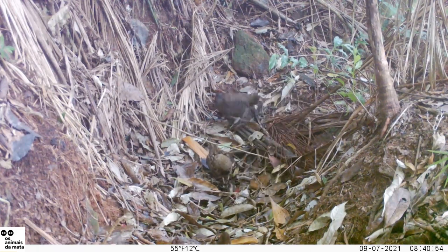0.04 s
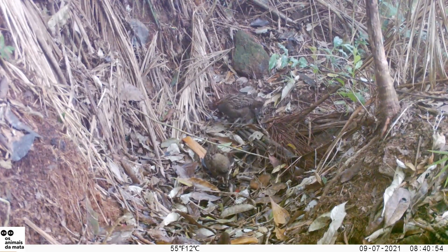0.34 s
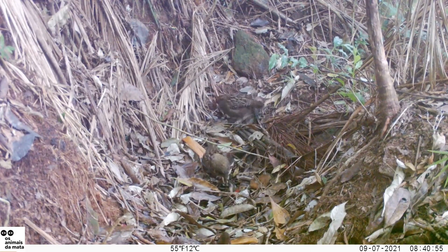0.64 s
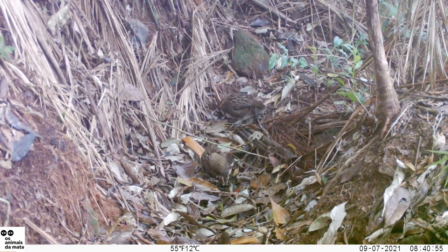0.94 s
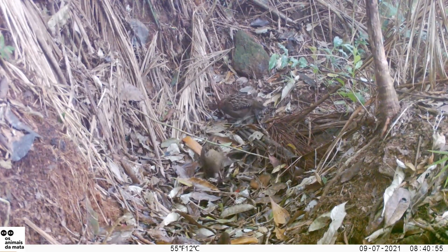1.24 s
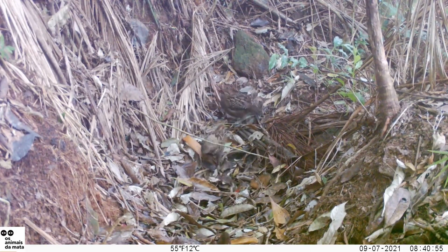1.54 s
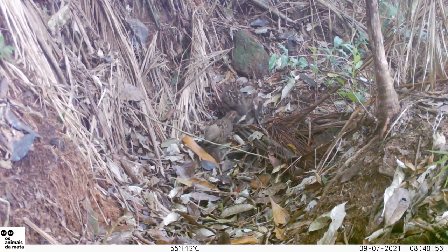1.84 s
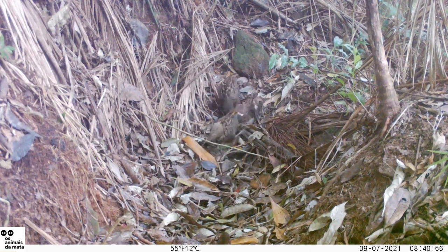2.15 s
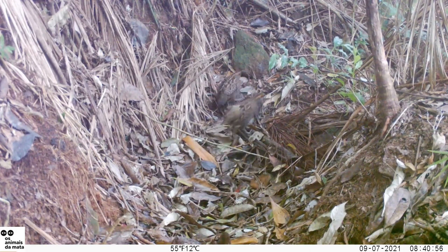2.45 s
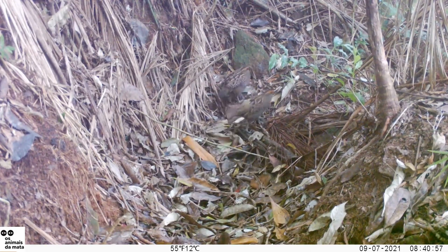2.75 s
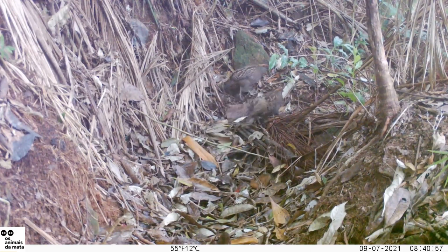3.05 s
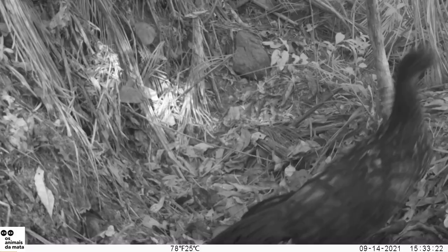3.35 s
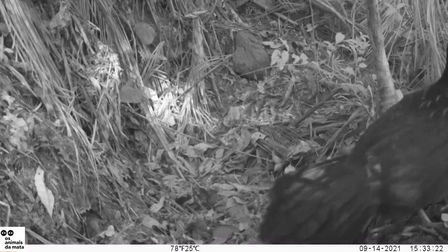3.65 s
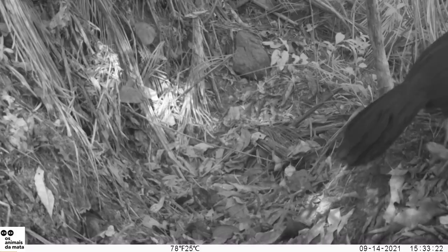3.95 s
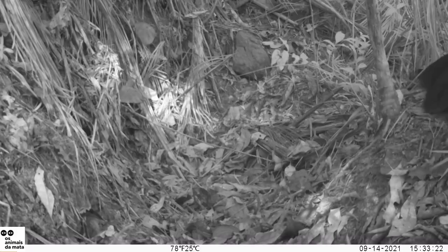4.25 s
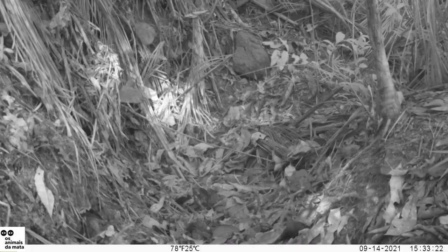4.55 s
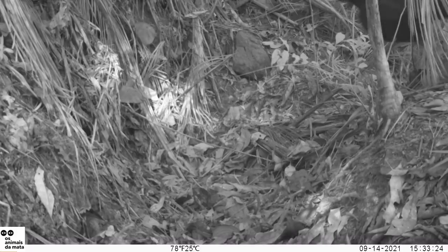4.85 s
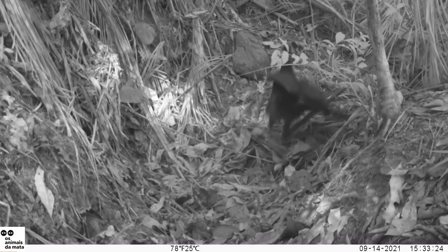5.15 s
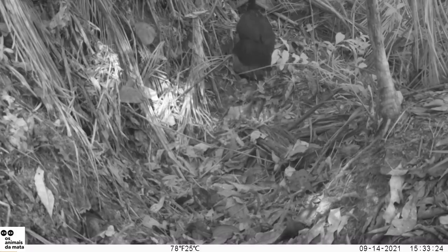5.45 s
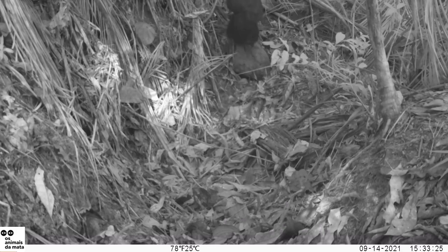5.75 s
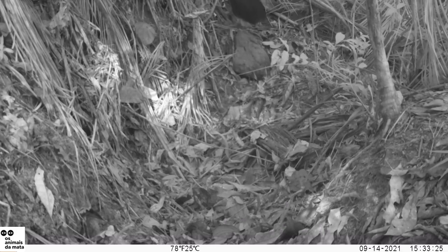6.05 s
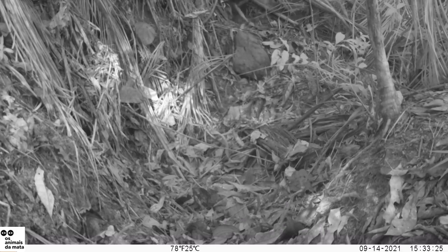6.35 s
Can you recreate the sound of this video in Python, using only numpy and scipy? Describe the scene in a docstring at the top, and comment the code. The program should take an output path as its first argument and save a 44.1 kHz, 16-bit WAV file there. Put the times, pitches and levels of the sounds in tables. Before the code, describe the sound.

In a quiet forest, small birds scratch lightly in dry leaves while one bird sings a quick series of soft hoots and others whistle and pipe far off. About halfway through, the sound cuts out for an instant. Then a large bird walks past close to the microphone, crushing dry leaves and snapping twigs with loud, dense crackling that eases as it moves away. A faint hiss and low hum lie underneath.

```python
"""Birds on a forest floor

Little birds scratch in dry leaves while one bird hoots and others whistle and pipe far off,
over a thin high tone, probably insects or frogs. The sound dips for a moment, then a large bird
walks past close by and moves away. Its steps crush leaves (thousands of tiny breaks), snap twigs
and press the ground; its wings puff air. A faint hiss and a low hum lie underneath."""
import sys
import numpy as np
from scipy import signal
from scipy.fft import rfft, irfft, next_fast_len
from scipy.io import wavfile
from scipy.ndimage import uniform_filter1d, map_coordinates

SR = 44100
rng = np.random.default_rng(int(sys.argv[2]) if len(sys.argv) > 2 else 0)


def store_wav(level_fs):
    """Save 16-bit WAV to argv[1]."""
    pcm = np.round(np.clip(np.atleast_2d(level_fs), -1, 1) * 32767)
    wavfile.write(sys.argv[1], SR, pcm.T.astype(np.int16))


N = 282662
LEAF_HZ, TOP_HZ = 6400, 15900  # where dry leaves ring; the highest pitch kept


def large_bird(span_s=(3.535, 6.41), settle_db=-44.5, fade_db_per_s=4, swish_db=-39):
    """Each stride crushes leaves: weight adds low crunch, brittle leaves trade midrange for treble."""
    # Pushes through the leaves: start_s, hold_s, level_db, weight_db (crunch), crisp_db (treble)
    strides = [(3.58, 0.083, -44, -16, -23.5), (3.68, 0.031, -40, -16.5, -21),
               (3.774, 0.019, -31, -20, -32.5), (3.875, 0.021, -44, -10.5, -33),
               (3.956, 0.078, -33.5, -18, -22.5), (4.14, 0.038, -36.5, -21, -25),
               (4.221, 0.0057, -39, -18.5, -19), (4.329, 0.056, -33.5, -19, -20.5),
               (4.403, 0.078, -34.5, -21, -23), (4.642, 0.084, -42, -17, -18),
               (4.753, 0.055, -39, -19.5, -18.5), (4.923, 0.03, -43.5, -18, -25),
               (4.984, 0.044, -42.5, -17.5, -13), (5.074, 0.034, -38.5, -20, -18),
               (5.174, 0.051, -41, -18.5, -21.5), (5.266, 0.1, -45, -22, -13),
               (5.442, 0.1, -39.5, -20, -20), (5.464, 0.015, -32.5, -20.5, -20),
               (5.619, 0.057, -40.5, -18.5, -17.5), (5.733, 0.039, -52, -17.5, -17),
               (5.976, 0.024, -48, -15, -18), (6.164, 0.013, -50.5, -10.5, -24),
               (6.37, 0.16, -48, -13.5, -22)]
    # Tone colour of crushed leaves: frequency_hz, level_db
    leaf_colour = [(100, -29.5), (400, -23), (900, -22), (1600, -16.5), (2800, -14), (4200, -9.5),
                   (6400, -3), (8800, -2.5), (11000, -6), (13000, -11), (15800, -14.5)]
    pushes = strokes(strides, rise_s=0.04, fall_s=0.051)
    # Trodden leaves keep settling, ever farther away.
    settling = amp(settle_db - fade_db_per_s * (np.arange(N) / SR - span_s[0]))
    level_db = 10 * np.log10(pushes.sum(0) + settling ** 2)
    weight_db, crisp_db = np.transpose(strides)[3:] @ pushes / pushes.sum(0)  # strong pushes count most
    sparse = leaf_breaks(span_s, per_s=2800, spread_db=3.0, fade_s=0.0046, ring=0.67)
    dense = leaf_breaks(span_s, per_s=7000, spread_db=2.5, fade_s=0.0024, ring=0.54)
    swish = 1 / (1 + np.exp((swish_db - level_db) / 5))  # under a hard push the breaks merge
    breaks = np.sqrt(1 - swish) * sparse + np.sqrt(swish) * dense
    leaves = leaf_ring(coloured(patchy(breaks, depth_db=2.8, size=2 ** 9), leaf_colour))
    below_low, below_mid, below_high = [filtered(leaves, lambda hz: 1 / (1 + (hz / edge_hz) ** 8))
                                        for edge_hz in (2600, 5000, 10500)]
    crunch = amp(weight_db) * patchy(below_low, depth_db=8, size=2 ** 10)
    midrange = amp(-20.5 - 0.56 * crisp_db) * unit(below_mid - below_low)
    crackle = amp(-0.64) * unit(below_high - below_mid)
    fizz = amp(crisp_db) * unit(leaves - below_high)
    return amp(level_db) * unit_during(crunch + midrange + crackle + fizz, span_s)


def twig_snaps(crack_s=0.0026, splinter_s=0.059, ring_s=0.0052, knock_s=0.011):
    """A break cracks, rings the twig briefly, knocks the ground and trails off in splinters."""
    # Twigs and stiff leaves breaking: start_s, peak_db (before the echo), pitch_hz
    snaps = [(1.2825, -47, 4500), (1.3052, -34, 6430), (1.4397, -36.5, 7200), (1.6092, -42, 5660),
             (1.66, -39.5, 6450), (3.105, -46, 6770), (3.5511, -23, 6140), (3.7625, -24.5, 4370),
             (3.771, -14, 7900), (3.788, -17.5, 5700), (3.81, -21, 7200), (3.8243, -15.5, 4380),
             (3.8603, -23.5, 6170), (3.8715, -15.5, 5400), (3.9295, -28.5, 4460), (4.001, -20, 8100),
             (4.2715, -26, 6760), (4.5134, -13, 6320), (4.517, -21, 6640), (4.5523, -17.5, 7600),
             (4.5698, -20, 5600), (4.664, -23, 8900), (4.677, -25, 7650), (4.6805, -23.5, 8060),
             (4.704, -27, 6680), (4.8165, -20.5, 6770), (4.961, -37, 6500), (4.986, -29.5, 7700),
             (5.2684, -27.5, 7400), (5.2856, -29, 6940), (5.3358, -25.5, 6970), (5.4697, -23.5, 6770),
             (5.959, -28.5, 5600), (5.987, -24.5, 7300), (5.992, -21.5, 7630), (6.149, -28.5, 5400),
             (6.191, -22, 5220), (6.2, -25, 4830), (6.2264, -36.5, 4900)]
    # Tone colour of the crack: frequency_hz, level_db
    crack_colour = [(300, -54), (1500, -12), (3000, -5), (5500, 3.5), (8500, 2), (12000, -8), (16000, -29)]
    # Tone colour of packed leaves and ground: frequency_hz, level_db
    knock_colour = [(100, -28), (250, -2.5), (480, -2.5), (1500, 7.5), (3000, -12), (8000, -49)]
    track, t = np.zeros(N), np.arange(2 ** 11) / SR
    rise = 1 - np.exp(-t / 0.00086)
    for start_s, peak_db, pitch_hz in snaps:
        crack_noise, knock_noise = rng.standard_normal((2, len(t)))
        splinters = amp(-29) * fade(t, splinter_s)
        crack = coloured(crack_noise * rise * (fade(t, crack_s) + splinters), crack_colour)
        twig = unit(np.sin(2 * np.pi * pitch_hz * t) * rise * fade(t, ring_s))
        knock = coloured(knock_noise * rise * fade(t, knock_s), knock_colour)
        knock_db = -22.5 + 15 * np.log2(LEAF_HZ / pitch_hz)  # thick twigs ring lower and knock harder
        snap = crack + twig + amp(knock_db) * knock
        add(track, start_s, amp(peak_db) * snap / np.abs(snap).max())
    return forest_echo(track, fade_s=0.061, echo_db=-11, size=2 ** 12)


def leaf_crumples():
    """A dry leaf caves in all at once, in a tight cluster of ticks."""
    # Single leaves collapsing: start_s, length_s, level_db
    crumples = [(3.62, 0.013, -34), (4.534, 0.022, -34.5), (4.566, 0.026, -32), (4.618, 0.017, -36),
                (4.94, 0.014, -32), (5.189, 0.015, -35), (5.428, 0.015, -38), (5.987, 0.017, -37.5),
                (6.153, 0.023, -38.5), (6.388, 0.015, -38.5)]
    return crushes([(*row, LEAF_HZ) for row in crumples], octaves=0.74, rough_db=-0.5)


def footfalls():
    """A foot presses the deeper leaves, which give way with a dull, hollow crunch."""
    # The large bird's weight coming down: start_s, length_s, level_db, pitch_hz
    steps = [(3.76, 0.048, -61, 460), (3.945, 0.056, -60.5, 690), (4.055, 0.0085, -50.5, 1160),
             (4.335, 0.048, -51, 1750), (4.365, 0.045, -62.5, 400), (4.4, .09, -65, 613),
             (4.487, 0.022, -60, 111), (4.509, .011, -48.5, 505), (5.445, 0.057, -57, 600),
             (5.63, 0.048, -75, 600), (5.955, .012, -56, 660)]
    return crushes(steps, octaves=0.88, rough_db=2.5)


def wing_puffs():
    """Body and wings push a soft, low puff of air each time the large bird hops away."""
    # Puffs of air: start_s, hold_s, level_db
    puffs = [(4.96, 0.14, -67.5), (5.17, 0.15, -70), (5.44, 0.082, -71)]
    # Tone colour of a puff: frequency_hz, level_db
    puff_colour = [(30, -6.5), (170, -5), (1200, -33)]
    level = np.sqrt(strokes(puffs, rise_s=0.039, fall_s=0.056).sum(0))
    return level * coloured(rng.standard_normal(N), puff_colour)


def small_birds(span_s=(0, 3.51), stir_db=-74):
    """Light feet and beaks turn over leaves a few metres away, with faint stirring in between."""
    # Quick little scratches: start_s, hold_s, level_db
    scratches = [(0, 0.013, -65), (.163, 0.012, -67.5), (.265, 0.023, -69.5), (.695, 0.006, -69),
                 (.73, 0.024, -60), (1.24, 0.021, -67), (1.325, 0.09, -66), (1.46, .09, -62.5),
                 (1.615, 0.011, -62), (1.67, 0.041, -62), (2.025, 0.032, -61), (2.11, 0.022, -62.5),
                 (2.235, 0.036, -61), (3.008, 0.029, -55.5), (3.095, 0.032, -59.5)]
    # Tone colour of distant leaves: frequency_hz, level_db
    leaf_colour = [(1000, -40), (2500, -15.5), (4500, -6.5), (6500, -1), (9000, -11), (12000, -23.5),
                   (15800, -39)]
    level = np.sqrt(strokes(scratches, rise_s=0.027, fall_s=0.054).sum(0) + amp(stir_db) ** 2)
    breaks = leaf_breaks(span_s, per_s=1100, spread_db=2.0, fade_s=0.0031, ring=0.6)
    flicker = amp(1.34 * wobble(60))
    rustle = forest_echo(breaks * flicker, fade_s=0.039, echo_db=0, size=2 ** 11)
    return level * unit_during(coloured(rustle, leaf_colour), span_s)


def hooting_bird(count=24, hump_s=0.046, base_hz=1307, climb_hz_per_s=55, effort_hz_per_db=8):
    """A nearby bird sings two-humped hoots that slow down and climb; louder hoots are higher."""
    # The singer's effort, in swells: time_s, level_db
    effort = [(.1, -74), (.4, -69.5), (.75, -72), (1.15, -67), (1.53, -75.5), (1.9, -67.5), (2.12, -71.5),
              (2.5, -67.5), (2.68, -76.5), (2.85, -71.5)]
    song, number = np.zeros(N), np.arange(count)
    times = 0.1 + 0.1263 * number + 0.000024 * number ** 3  # the gaps lengthen, ever faster
    levels = np.interp(times, *np.transpose(effort))
    pitches = base_hz + climb_hz_per_s * times + effort_hz_per_db * (levels - levels.mean())
    humps = np.arange(-0.6 * hump_s, 1.5 * hump_s, 1 / SR) / hump_s  # 0 at the first hump, 1 at the next
    late = np.maximum(humps, 0)
    pitch_dip = 1 - 0.0632 * np.sin(np.pi * humps) ** 2
    for time_s, hz, db in zip(times, pitches, levels):
        # The second hump is lower and weaker, less so as the song goes on.
        pitch_hz = hz * (0.925 + 0.0168 * time_s) ** late * pitch_dip
        swell = amp(db + (-8 + 1.5 * time_s) * late) * signal.windows.tukey(len(humps), 0.4)
        add(song, time_s + humps[0] * hump_s, swell * tone(pitch_hz, waver=0.0027))
    return forest_echo(song, fade_s=0.2, echo_db=-11, size=2 ** 14)


def whistling_birds():
    """Far-off birds sing sliding whistles, heard mostly by their echo."""
    # Whistles: start_s, length_s, start_hz, end_hz, level_db, bend (above 0 slides early, below 0 late)
    whistles = [(0, 0.31, 5100, 3300, -79, .6), (0.48, 0.12, 3060, 2250, -76, 1),
                (2.6, 0.11, 6050, 4260, -68.5, 1), (2.897, 0.1, 3930, 5000, -62, 2),
                (3.12, .22, 3900, 5290, -62, 7), (3.11, .19, 3170, 3600, -71, -3.5),
                (3.36, 0.165, 7360, 5990, -56, 6.5), (3.435, .06, 2870, 3270, -69, 1)]
    track = np.zeros(N)
    for start_s, length_s, start_hz, end_hz, level_db, bend in whistles:
        add(track, start_s, amp(level_db) * note(length_s, start_hz, end_hz, waver=0.006, bend=bend))
    return forest_echo(track, fade_s=0.62, echo_db=7, size=2 ** 13)


def far_calls(waver_hz=36):
    """Far-off birds pipe short notes over a thin, steady high tone, probably insects or frogs."""
    # Short notes and long tones: start_s, length_s, pitch_hz, level_db
    notes = [(0, 0.31, 1500, -77.5), (.4, 0.091, 1570, -73), (.715, 0.15, 1495, -72), (0, 1.3, 3137, -83),
             (1.689, 0.12, 1508, -69), (1.9, 0.11, 1520, -70), (2.531, 0.14, 1519, -70),
             (1.7, 1.6, 3150, -82), (2.92, 0.3, 2280, -80), (3.359, 0.099, 1520, -68),
             (6.061, 0.09, 1545, -63)]
    track = np.zeros(N)
    for start_s, length_s, hz, level_db in notes:
        add(track, start_s, amp(level_db) * note(length_s, hz, hz, waver=waver_hz / hz))
    return forest_echo(track, fade_s=1.0, echo_db=1, size=2 ** 14)


def background(air_db=-66.5, hum_db=-79.5, hum_hz=90):
    """Faint forest air and hiss, with a low electrical hum."""
    # Tone colour of the steady air and hiss: frequency_hz, level_db
    air_colour = [(12, -36), (20, 0), (93, -1.5), (340, -13.5), (1050, -20), (1350, -21), (1650, -22.5),
                  (3040, -22.5), (15800, -27)]
    hum = amp(hum_db) * np.sin(2 * np.pi * hum_hz * np.arange(N) / SR)
    return amp(air_db) * coloured(rng.standard_normal(N), air_colour) + hum


def leaf_breaks(span_s, per_s, spread_db, fade_s, ring):
    """Many tiny breaks, each a tick and a short ring at its own pitch, a few much louder than most."""
    start_s, end_s = span_s
    length_s = end_s - start_s
    count, t = int(per_s * length_s), np.arange(2 ** 7) / SR
    when, pitch, smallness, life = rng.random((count, 4)).T[..., None]
    decay = fade(t, fade_s * 2 ** (2 * life - 1))
    rings = ring * np.sin(2 * np.pi * TOP_HZ * pitch * t) * decay
    ticks = rng.standard_normal((count, len(t))) * decay ** 2
    gain = amp(-spread_db * np.log(np.maximum(smallness, 0.01)))
    places = ((start_s + when * length_s) * SR).astype(int) + np.arange(len(t))
    track = np.bincount(places.ravel(), (gain * (rings + ticks)).ravel(), N)[:N]
    return unit(track) * np.sqrt(length_s * SR / N)


def strokes(rows, rise_s, fall_s):
    """Each stroke's power over time: it builds, holds and dies away; short ones have sharper edges."""
    start_s, hold_s, level_db = np.transpose(rows)[:3, :, None]
    t = np.arange(N) / SR - start_s
    outside = np.maximum(-t, 0) / rise_s + np.maximum(t - hold_s, 0) / fall_s
    stretch = np.sqrt(hold_s / 0.1)  # rise_s and fall_s apply to a stroke held for 0.1 s
    return amp(level_db) ** 2 * np.exp(-2 * np.minimum(outside / stretch, 20))


def crushes(rows, octaves, rough_db):
    """Short, rough bursts that swell and fade, each ringing around its own pitch."""
    track = np.zeros(N)
    for start_s, length_s, level_db, pitch_hz in rows:
        size = int(length_s * SR)
        ticks = rng.standard_normal(size) * amp(rough_db * wobble(pitch_hz / 4, size))
        body = unit(filtered(ticks, lambda hz: resonance(hz, pitch_hz, octaves) ** 2))
        add(track, start_s, amp(level_db) * body * signal.windows.hann(size))
    return track


def leaf_ring(x, boost_db=6):
    """The leaves ring at a pitch that wanders as one after another is pressed."""
    wander_hz = LEAF_HZ * 2 ** (0.21 * wobble(45))
    hz, times, spectrum = signal.stft(x, SR, nperseg=2 ** 8)
    centre_hz = np.interp(times * SR, np.arange(N), wander_hz)
    boost = amp(boost_db * resonance(hz[:, None], centre_hz, octaves=0.19))
    return unit(signal.istft(spectrum * boost)[1][:N])


def patchy(x, depth_db, size):
    """Narrow bands of pitch briefly swell and drop out, giving a hollow, patchy sound."""
    spectrum = signal.stft(x, nperseg=size)[2]
    patches = uniform_filter1d(rng.standard_normal(spectrum.shape), size=3, axis=0)  # smooth over pitch
    patches = uniform_filter1d(patches, size=4, axis=1)  # and over time
    gain = amp(depth_db * np.minimum(unit(patches), 1))
    return unit(signal.istft(spectrum * gain, nperseg=size)[1][:N])


def note(length_s, start_hz, end_hz, waver, bend=1):
    """A tone that swells and fades while it slides from start_hz to end_hz."""
    progress = np.linspace(0, 1, int(length_s * SR))
    slide = np.expm1(-bend * progress) / np.expm1(-bend)
    return tone(start_hz + (end_hz - start_hz) * slide, waver) * np.sin(np.pi * progress) ** 0.5


def tone(hz, waver):
    """A pure tone following the pitches in hz, unsteady by the fraction waver."""
    unsteady_hz = hz * (1 + waver * wobble(90, len(hz)))
    return np.sqrt(2) * np.sin(2 * np.pi * np.cumsum(unsteady_hz) / SR)


def forest_echo(x, fade_s, echo_db, size):
    """Trunks and bushes scatter the sound; birds move, so each piece of size samples gets a new echo."""
    decay = fade(np.arange(int(fade_s * SR)) / SR, fade_s)
    window, echo = signal.windows.cosine(size), np.zeros(N)
    for start in range(0, N - size, size // 2):
        piece = x[start:start + size] * window
        if piece.any():
            tail = rng.standard_normal(len(decay)) * decay
            add(echo, start / SR, signal.fftconvolve(piece, tail / np.sqrt(np.sum(tail ** 2))))
    return (x + amp(echo_db) * echo) / np.hypot(1, amp(echo_db))


def resonance(hz, centre_hz, octaves):
    """A bell-shaped band around a centre pitch, 1 at its top."""
    return 1 / (1 + (np.log2((hz + 1) / centre_hz) / octaves) ** 2)


def coloured(x, colour):
    """Shape x by (frequency_hz, level_db) points, then scale it to average level 1."""
    points_hz, points_db = np.transpose(colour)
    return unit(filtered(x, lambda hz: amp(np.interp(np.log(hz + 1), np.log(points_hz), points_db))))


def filtered(x, gain_at):
    """Turn each frequency of x up or down by gain_at(hz)."""
    size = next_fast_len(len(x) + 2 ** 12)
    return irfft(rfft(x, size) * gain_at(np.fft.rfftfreq(size, 1 / SR)), size)[:len(x)]


def wobble(per_s, size=N):
    """A smooth curve through per_s random points a second."""
    points = rng.standard_normal(int(size * per_s / SR) + 4)
    return map_coordinates(points, [np.arange(size) * per_s / SR])


def fade(t, fade_s):
    """A gain that falls by 60 dB in fade_s seconds."""
    return amp(-60 * t / fade_s)


def amp(db):
    """Decibels to gain."""
    return 10 ** (np.asarray(db) / 20)


def unit(x):
    """Scale to an average (rms) level of 1."""
    return x / np.sqrt(np.mean(x ** 2) + 1e-20)


def unit_during(x, span_s):
    """Scale to an average (rms) level of 1 within a span of time."""
    start_s, end_s = span_s
    return x / np.sqrt(np.mean(x[int(start_s * SR):int(end_s * SR)] ** 2) + 1e-20)


def add(track, start_s, sound):
    """Mix a sound into the track at start_s."""
    start = int(np.clip(round(start_s * SR), 0, N))
    track[start:start + len(sound)] += sound[:N - start]


def scene():
    """Ground sounds, calls and background, mixed into one channel."""
    ground = large_bird() + twig_snaps() + leaf_crumples() + footfalls() + wing_puffs() + small_birds()
    calls = hooting_bird() + whistling_birds() + far_calls()
    return (ground + calls + background())[None]


def record(dry):
    """The level dips briefly, and everything above TOP_HZ is cut."""
    # A short dip in the whole sound: time_s, gain_db
    dip = [(3.508, 0), (3.517, -35), (3.53, -35), (3.54, 0)]
    gain_db = np.interp(np.arange(N) / SR, *np.transpose(dip))
    return filtered(dry[0] * amp(gain_db), lambda hz: hz < TOP_HZ)[None]


dry = scene()
out = record(dry)
store_wav(out)
```